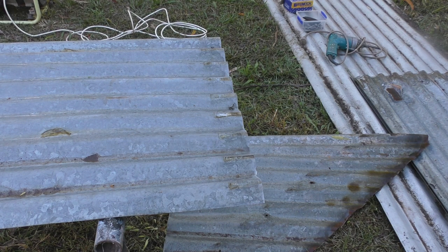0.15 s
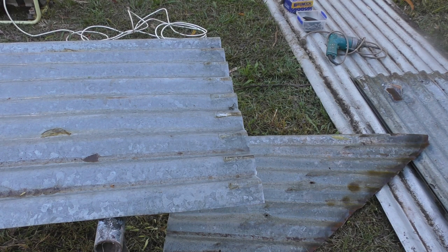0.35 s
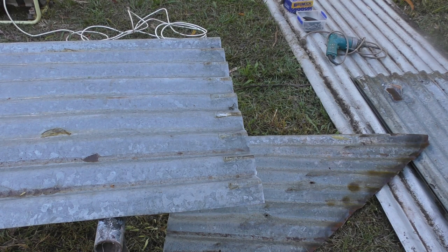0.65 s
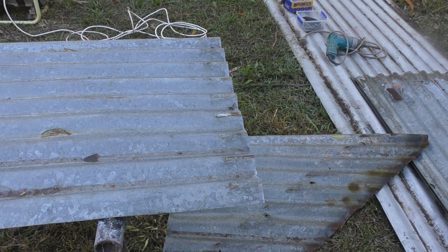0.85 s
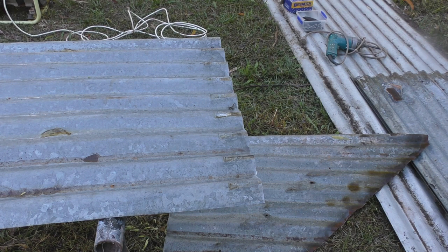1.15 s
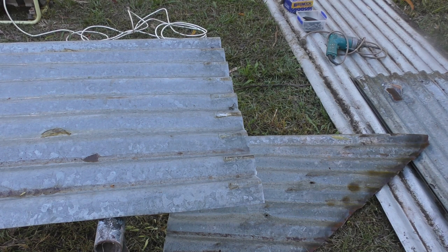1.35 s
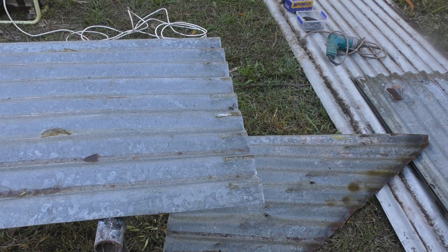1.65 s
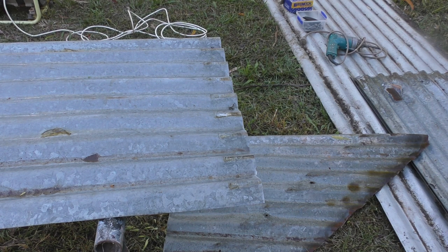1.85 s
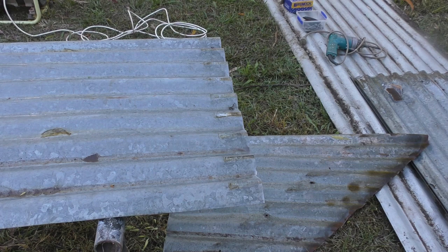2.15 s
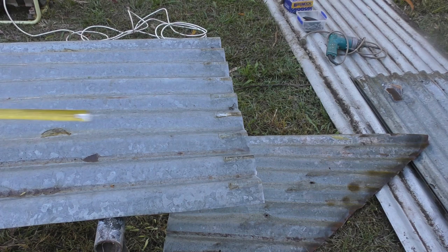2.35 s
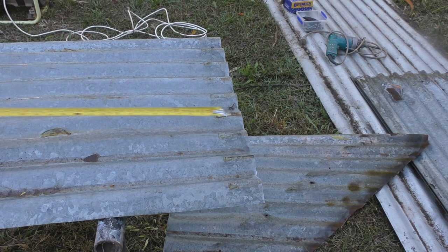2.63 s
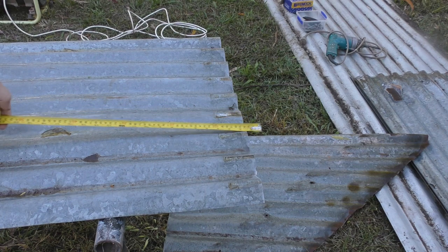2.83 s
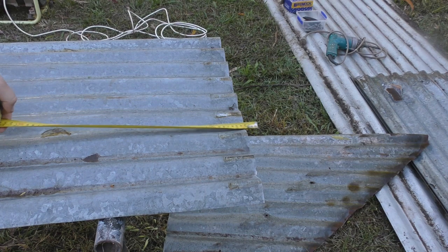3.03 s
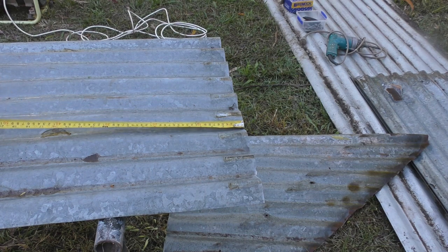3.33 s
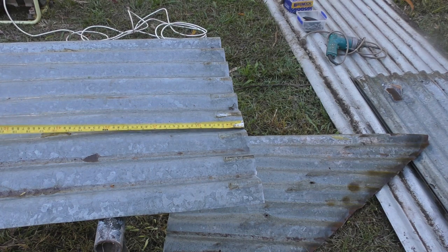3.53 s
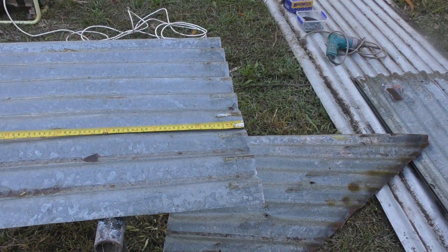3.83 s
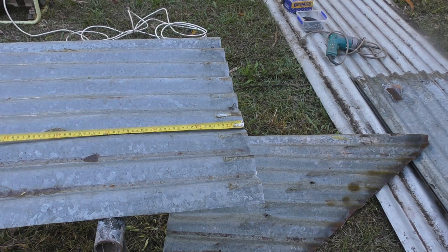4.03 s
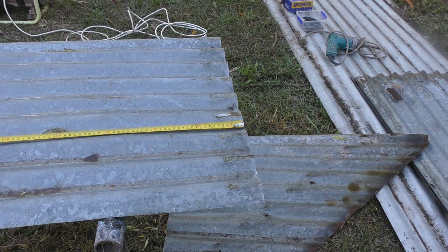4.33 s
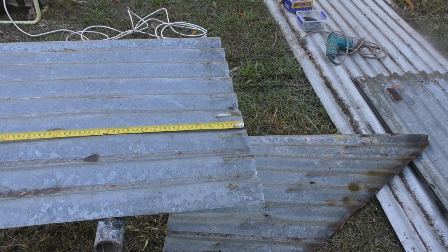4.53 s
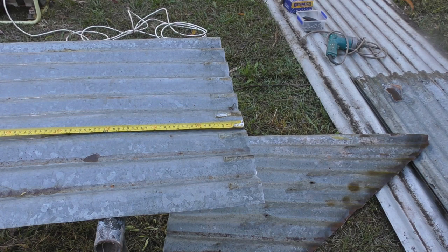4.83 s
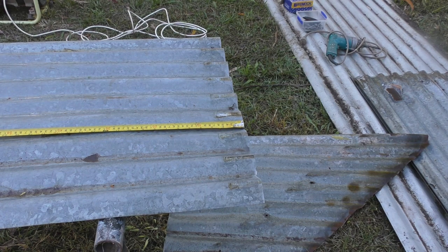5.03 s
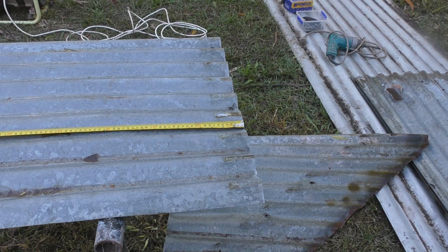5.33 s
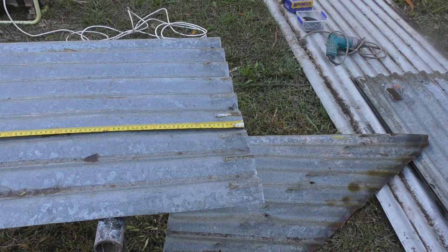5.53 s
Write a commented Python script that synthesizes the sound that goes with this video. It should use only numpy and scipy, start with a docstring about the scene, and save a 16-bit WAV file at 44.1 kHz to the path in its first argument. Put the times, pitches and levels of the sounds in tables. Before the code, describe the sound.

A quiet open-air hush lies under everything. From the start, hands softly rustle, tick and bump on the case of a tape measure, a little left of the stereo microphone, easing off around 1.4 seconds and resuming just after 2. From 1.8 to 2.9 seconds a faint, thin whistle far away sounds four notes, the last one lower. At 2.8 seconds the steel blade lands on a corrugated iron sheet and slides across it in short, gritty, hissing strokes with sharp snaps and rattles, making the sheet boom and clang. This is the loudest part, with the hardest snaps near 3.2, 3.6 and 3.8 seconds. At about 3.9 seconds the blade hooks the edge and rings more brightly as it tightens. From 4.4 seconds the strokes weaken and the sheet's ringing fades. Near 5.5 seconds the hands briefly click and rub the case again.

```python
"""Outdoors, over a quiet hush, hands rustle and tick on a tape measure, left of a stereo microphone. From 1.8 s
a faint, far whistle sounds three notes, the last one stepping lower partway through. At 2.8 s the steel blade
lands on a corrugated iron sheet and slides and snaps across it; its rough push makes the sheet boom and clang.
At 3.85 s the blade hooks the edge and, pulled tight, rings more. The strokes weaken, the sheet rings on and
fades, and near 5.5 s the hands work the case again."""
import sys
import numpy as np
from scipy import signal
from scipy.fft import rfft, irfft
from scipy.io import wavfile
from scipy.ndimage import uniform_filter1d

SR = 44100
rng = np.random.default_rng(int(sys.argv[2]) if len(sys.argv) > 2 else 0)


def int16_out(signal):
    """Quantize to a 16-bit WAV file."""
    q = np.round(np.clip(np.atleast_2d(signal).T, -1, 1) * 32767)
    wavfile.write(sys.argv[1], SR, q.astype(np.int16))


N = 250488
T = np.arange(N) / SR
KNOCK_HZ, BRIGHT_HZ, CRACK_HZ, SIZZLE_HZ = 800, 1700, 3600, 8500  # where each range of sound starts
HISS_TOP_HZ = 15800

# the pitches at which the steel blade rings: f/Hz, width/Hz, relative level/dB
BLADE_RINGS = [(4440, 2000, 0.5), (5440, 330, 4), (5920, 200, 1.5), (6300, 900, -11), (6420, 280, -8.5),
               (8700, 370, -13)]
# how alike blade and case sound on the left and right: f/Hz, likeness/0-1
NEAR_LIKENESS = [(1000, 1), (4000, 0.96), (12000, 1)]


def sheet(bright, clang, boom):
    """The blade's rough push rings the iron sheet; the contact wanders over six spots."""
    # the blade drops on the sheet and makes it boom: t/s, push/dB
    blows = [(2.843, -12), (3.139, -3.5), (3.214, -6.5), (4.002, -12)]
    shares = undb([6 * walk(6) for _ in range(6)])
    shares = shares / np.sqrt(np.sum(shares ** 2, axis=0))
    spots = [sheet_tap(size=28000) for _ in range(6)]
    ranges = (bright, BRIGHT_HZ, 14000), (clang, KNOCK_HZ, BRIGHT_HZ), (boom, 50, KNOCK_HZ)
    out = 0
    for gain, lo_hz, hi_hz in ranges:
        force = gain * grit(spread_db=1.5, per_s=900) * rng.standard_normal(N)
        if gain is boom:
            for start, db in blows:
                force[int(start * SR)] += undb(db)
        for share, spot in zip(shares, spots):
            tap = band(spot, lo_hz, hi_hz)
            tap = tap / np.sqrt(np.sum(np.mean(tap, axis=0) ** 2))
            out = out + signal.fftconvolve((force * share)[None], tap, axes=1)[:, :N]
    return out


def sheet_tap(size):
    """One tap at one spot on the sheet: a few strong tones over a dense wash of weak ones."""
    # the sheet's own tones: f/Hz, relative level/dB, time to fade by 60 dB/s
    sheet_tones = [(129, -11, .5), (185, -1, .5), (210, 3, .55), (265, 4.5, .45), (305, -4, .5),
                   (365, -2, .5), (436, -5, .4), (458, -11, .4), (651, -12, .4), (878, -10, .5),
                   (1040, -5, .5), (1082, -3, .5), (1179, -2, .45), (1270, -3, .45), (1346, -1.5, .45),
                   (1405, -1, .45), (1582, -6, .45), (1711, -7, .4), (2036, -11, .25), (2261, -10, .22),
                   (2552, -10, .22), (2691, -11, .22)]
    # tone colour of the wash: f/Hz, relative level/dB
    wash_colour = [(35, -55), (60, -18.5), (174, -3), (232, -6), (265, 6), (331, -4.5), (361, -4),
                   (576, -5.5), (900, -6.5), (1050, -0.5), (1400, -3), (1560, -9.5), (2900, -10.5),
                   (3790, -14), (6170, -25.5), (12000, -46), (15600, -53), (22000, -120)]
    # how long the wash rings: f/Hz, time to fade by 60 dB/s
    wash_fade = [(100, 0.76), (300, 0.84), (1200, 0.67), (3500, 0.087), (10000, 0.015)]
    # how alike the wash is on the left and right: f/Hz, likeness/0-1
    wash_likeness = [(30, 0.2), (100, 0.86), (400, 0.91), (1000, 0.8), (2200, 0.81), (5000, .9)]
    # how much louder the sheet is on the left: f/Hz, left minus right/dB
    sheet_pan = [(100, -1), (300, 0.5), (600, 1), (1200, 6.5), (2400, 7.5), (4500, 7), (10000, -14.5)]
    # how far ahead its wave is on the left: f/Hz, lead/radians
    sheet_lead = [(300, 0.03), (1120, 0.63), (1400, 0.8), (2700, -0.8), (4500, -1.06), (7000, -0.42)]
    t, hz = T[:size], np.fft.rfftfreq(size, 1 / SR)
    spectrum = rfft(stereo_noise(size, wash_likeness)) * undb(over_hz(wash_colour, hz))
    wash = tones = 0
    for centre_hz in 44 * 2. ** np.arange(9):
        fade_s = over_hz(wash_fade, centre_hz)
        octave = np.clip(1 - np.abs(np.log2((hz + 1) / centre_hz)), 0, 1)  # overlapping bands
        wash = wash + irfft(spectrum * octave, size) * die_away(t, fade_s) / np.sqrt(fade_s)
    # each spot lies at its own angle to the microphone
    scatter = np.minimum(hz / KNOCK_HZ, 1) * rng.standard_normal((2, 1))
    pan_db = over_hz(sheet_pan, hz) - scatter[0]
    lead = over_hz(sheet_lead, hz) + 0.17 * scatter[1]
    for tone_hz, db, fade_s in sheet_tones:
        strength = undb(db + 2.5 * rng.standard_normal())  # varies from spot to spot
        tone_hz = tone_hz * (1 + 0.006 * rng.standard_normal())  # the pressing blade shifts the pitch
        wave = np.sin(2 * np.pi * tone_hz * t + 7 * rng.random())
        tones = tones + strength * wave * die_away(t, fade_s)
    tap = unit(wash) + undb(-2.5) * unit(tones)
    return irfft(pan(rfft(tap), pan_db) * left_ahead(lead), size)


def strokes():
    """Each stroke of the blade lands, fades and lifts: gains for bright ring, clang, boom and two hisses."""
    # strokes on the iron: t/s, length/s, bright/dB, clang/dB, boom/dB, hiss/dB, fine hiss/dB,
    # base fade/(dB per s)
    blade_strokes = [(2.844, 0.22, -33, -35.5, -33.5, -58, -55, 80),
                     (3.072, 0.078, -53.5, -47.5, -49.5, -63, -63, -12),
                     (3.134, 0.094, -37, -36, -40, -39, -38.5, -7),
                     (3.215, 0.22, -27, -31.5, -30.5, -27, -49, 71.5),
                     (3.411, 0.13, -33, -38, -35.5, -37, -45, 64),
                     (3.523, 0.13, -33.5, -37, -38.5, -33.5, -44, 1),
                     (3.642, 0.23, -34, -37, -37.5, -31.5, -37.5, 10),
                     (3.898, 0.088, -37, -38, -40.5, -44, -48, 1),
                     (3.99, 0.15, -34.5, -32, -35.5, -40.5, -45, 33),
                     (4.151, 0.14, -35, -35, -36.5, -45, -49.5, -13),
                     (4.291, 0.104, -36, -33, -37, -43.5, -46.5, 66),
                     (4.395, 0.21, -48, -48.5, -42, -51, -52.5, 29),
                     (4.562, 0.28, -45.5, -43, -40.5, -48.5, -56, 31),
                     (4.851, 0.26, -56.5, -57.5, -47.5, -65, -59, 51),
                     (5.141, 0.66, -68.5, -61.5, -55.5, -92.5, -75, 43.5)]
    land_s, lift_s = 0.003, 0.004
    fade_factors = 1.33, 1, 1, 2, 0.75  # the hiss fades faster than the push on the sheet
    power = np.zeros((5, N))
    for start, length, *levels_db, base_fade in blade_strokes:
        span = slice(int(start * SR), int((start + length + 10 * lift_s) * SR))
        t = T[span] - T[span][0]
        contact = rise(t, land_s) * np.exp(-np.clip(t - length, 0, None) / lift_s)
        for row, db, factor in zip(power, levels_db, fade_factors):
            row[span] += (contact * undb(db - base_fade * factor * t)) ** 2
    return np.sqrt(power)


def snaps():
    """Blade and case snap: a sharp tick and a dying rattle, heard as hollow knock, crack and sizzle."""
    # the blade hits the iron: t/s, knock gain/dB, knock f/Hz, crack gain/dB, crack f/Hz,
    # sizzle gain/dB, base tick fade/s, rattle against tick/dB, base rattle fade/s
    blade_snaps = [(2.8422, -34.5, 1930, -24, 4200, -30, 0.0045, -10, 0.14),
                   (2.8603, -26.5, 1390, -46, 4000, -32.5, 0.0026, -7, 0.17),
                   (2.915, -29, 1400, -40, 4000, -36, 0.0057, -10, 0.04),
                   (3.1391, -25.5, 1310, -43, 6000, -50, 0.0068, -11.5, 0.3),
                   (3.2125, -20, 2870, -8, 6700, -4.2, 0.0056, -18, 0.25),
                   (3.405, -46, 1400, -36, 5900, -34, .005, -6, 0.055),
                   (3.4202, -26.5, 2900, -16.5, 6050, -23, 0.0054, -5.5, 0.071),
                   (3.463, -40, 1410, -32, 6000, -33, .005, -6, 0.057),
                   (3.492, -25.5, 2300, -39, 5000, -34, 0.0054, -13, .03),
                   (3.509, -40, 1400, -32, 7800, -36, 0.0045, -2, 0.043),
                   (3.5279, -34, 1400, -31, 6200, -35, 0.004, -8, 0.078),
                   (3.538, -23, 1380, -26, 5470, -26, .005, -5, 0.093),
                   (3.5685, -18, 2960, -9, 4980, -6.5, 0.0036, -10, 0.1),
                   (3.5837, -31, 3000, -16, 5630, -19.5, .005, -4.5, 0.2),
                   (3.693, -45, 1400, -40, 7500, -26, 0.0046, -4, .04),
                   (3.7567, -31, 1400, -22.5, 5500, -24.5, .004, -1, 0.05),
                   (3.809, -50, 1400, -16, 7050, -29, .005, -9, 0.052),
                   (3.8398, -30, 2800, -1, 7650, -3.5, 0.0026, -23, 0.11),
                   (3.8775, -43, 1400, -9, 6100, -16.5, 0.0064, -3, 0.079),
                   (3.895, -30.5, 2570, -10.5, 6700, -13, 0.0044, -8, 0.1),
                   (4.0005, -31, 1400, -21.5, 6300, -37, 0.0055, -2.5, 0.064),
                   (4.0354, -33, 2800, -17.5, 5640, -25.5, 0.0032, -2.5, 0.13),
                   (4.1614, -33.5, 1390, -20.5, 4770, -42, 0.0049, 0.5, 0.096),
                   (4.1985, -51, 1340, -19.5, 5050, -25.5, 0.0065, -1, 0.075),
                   (4.214, -43, 1400, -22, 5600, -45, .006, 0.5, .05),
                   (4.2278, -26.5, 1380, -13.5, 5650, -20, .005, -6, 0.12),
                   (4.261, -36, 1400, -32, 5300, -25, .004, -24, 0.13),
                   (4.286, -43, 1400, -31, 6300, -51, .005, -5, 0.08),
                   (4.3135, -29, 1400, -24, 6300, -32, .005, -8, 0.1),
                   (4.3564, -27.5, 1380, -43, 7000, -28, .005, -7.5, 0.06),
                   (4.38, -48, 1400, -36, 6000, -37, 0.0037, -10, .03),
                   (4.568, -47, 1400, -20, 5340, -26.5, 0.0063, -5, 0.036),
                   (4.6823, -42, 1400, -18.5, 5500, -25, 0.0068, -9.5, 0.065),
                   (4.762, -52, 1400, -20.5, 5440, -31, 0.0082, -7, 0.074)]
    # the case ticks in the hand: t/s, knock gain/dB, knock f/Hz, crack gain/dB, sizzle gain/dB
    case_ticks = [(0.0324, -45, 1570, -62, -65), (0.0532, -35.5, 1540, -39, -45),
                  (0.1522, -45, 1220, -64, -66), (0.165, -46, 1560, -57, -65),
                  (0.371, -42.5, 2420, -41.5, -41.5), (0.4587, -35, 2050, -29.5, -27.5),
                  (0.5018, -35.5, 3020, -33, -26.5), (0.63, -37, 2040, -38, -39),
                  (0.6427, -60, 1710, -30.5, -37), (0.6745, -40, 2280, -31, -43),
                  (0.704, -45.5, 2600, -35, -48), (0.7068, -41, 2550, -36, -37),
                  (0.75, -50, 2370, -37, -39), (0.791, -40, 1800, -39, -60), (0.855, -34, 2550, -42, -52),
                  (0.893, -32.5, 2180, -34, -48), (0.958, -43, 1270, -60, -65), (.97, -49, 1100, -68, -66),
                  (1.1036, -46.5, 2200, -45, -56), (1.1913, -47.5, 1780, -54, -67),
                  (1.221, -47, 1100, -60, -64), (1.2504, -28, 1620, -45, -49), (1.29, -52, 3320, -52, -56),
                  (1.307, -48, 1320, -66, -50), (1.5795, -68, 1600, -50, -49),
                  (2.0822, -47.5, 1240, -46, -51), (2.1, -43, 1240, -55, -63), (2.109, -40, 1190, -56, -60),
                  (2.115, -39.5, 1150, -61, -50), (2.137, -51, 1120, -53, -49),
                  (2.1603, -41, 1150, -62, -58), (2.166, -41, 1890, -60, -60), (2.175, -49, 1300, -62, -62),
                  (2.2, -42, 1630, -44, -61), (2.211, -34.5, 1700, -44, -45), (2.235, -48, 1980, -46, -54),
                  (2.2463, -40.5, 1200, -49, -39.5), (2.3095, -56, 1160, -63, -47),
                  (2.5938, -53, 1150, -63, -43), (2.6727, -41, 1280, -66, -61),
                  (5.553, -59, 1250, -31, -51), (5.558, -60, 1250, -42, -51), (5.5935, -43, 1420, -52, -58),
                  (5.633, -55, 1500, -52, -48), (5.653, -58, 1300, -56, -50), (5.664, -47, 1080, -43, -50)]
    # all case ticks share one crack pitch, tick and rattle; the last number is the lean left in dB
    hits = [(*row[:-1], 5600, row[-1], 0.0051, -10.5, 0.053, 7.5) for row in case_ticks]
    hits += [(*row, 3.5) for row in blade_snaps]
    size = 8192
    tracks = np.zeros((3, 2, N + size))
    for start, knock_db, knock_hz, crack_db, crack_hz, sizzle_db, *shape, pan_db in hits:
        knock = snap_burst(size, *shape, stretch=1.1, click_db=8)
        knock = knock + undb(12.5) * ring(knock, knock_hz, 640)
        crack = snap_burst(size, *shape, stretch=1, click_db=9.5)
        crack = undb(-10) * crack + ring(ring(crack, crack_hz, 3500), crack_hz, 3500)
        sizzle = snap_burst(size, *shape, stretch=0.55, click_db=6.5)  # the treble dies first
        i = int(start * SR)
        for track, burst, db in zip(tracks, (knock, crack, sizzle), (knock_db, crack_db, sizzle_db)):
            track[:, i:i + size] += pan(undb(db) * burst, pan_db)
    knocks, cracks, sizzles = tracks[:, :, :N]
    knocks = band(knocks, KNOCK_HZ, CRACK_HZ, order=4)
    # a snap rings the blade less, and more evenly, than steady rubbing does
    cracks = band(blade(cracks, BLADE_RINGS, ring_db=-21.5, flex_db=-1.5), CRACK_HZ, SIZZLE_HZ)
    sizzles = band(sizzles + undb(2.5) * ring(sizzles, 9220, 4000), SIZZLE_HZ, 22000, order=2)
    return knocks, cracks + sizzles


def snap_burst(size, tick_s, rattle_db, rattle_s, stretch, click_db):
    """The noise of one hit: a click at first contact, a short tick and a longer rattle."""
    t = T[:size]
    noise = stereo_noise(size, NEAR_LIKENESS)
    noise = noise / np.sqrt(np.mean(noise[:, :64] ** 2)) * rise(t, 0.00034)
    tick = die_away(t, tick_s * stretch)
    rattle = undb(rattle_db) * rise(t, 0.0016) * die_away(t, rattle_s * stretch)
    burst = noise * (tick + rattle)
    burst[:, 8] += undb(click_db)
    return burst


def blade(x, rings, ring_db=0, flex_db=2.5):
    """The thin curved steel adds its ringing to x; as it flexes, now one pitch stands out, now another."""
    hooked_s, loose_db, tight_db = 3.85, -12, 7.5  # once the hook holds, the stretched blade rings more
    ringing = sum(undb(db + flex_db * walk(14)) * ring(x, hz, width) for hz, width, db in rings)
    return x + undb(ring_db + np.where(T < hooked_s, loose_db, tight_db)) * ringing


def rub(hiss_gain, fine_gain):
    """The sliding blade catches many times a second, making a gritty hiss with a finer one above it."""
    # the blade's highest rings: f/Hz, width/Hz, relative level/dB
    top_rings = [(11000, 390, -25.5), (12400, 1200, -21.5)]
    catches = grit(spread_db=1.6, per_s=1500)
    noise, fine_noise = (stereo_noise(N, NEAR_LIKENESS) * catches for _ in range(2))
    hiss = band(blade(noise, BLADE_RINGS), CRACK_HZ, SIZZLE_HZ)
    hiss = unit(hiss) * hiss_gain * undb(1.8 * walk(44))
    fine = band(blade(fine_noise, top_rings), 8000, 14000, order=1)
    fine = cut_above(band(fine, SIZZLE_HZ, 19000), HISS_TOP_HZ)
    fine = unit(fine) * fine_gain * undb(2.6 * walk(40))
    return pan(hiss + fine, 3.1)


def out_of_step(x):
    """The waves from blade and case reach the microphone's two sides slightly out of step."""
    # how far ahead the wave is on the left: f/Hz, lead/radians
    near_lead = [(0, 0), (1120, 0.9), (2240, -0.0), (2930, 0.2), (3620, -0.8), (4310, 0.78), (4910, -1.2),
                 (6890, -0.0), (10300, -1.1), (11500, -0.2), (11900, -0.76), (14100, -0.1), (15800, 0.0),
                 (16500, 0.5)]
    lead = over_hz(near_lead, np.fft.rfftfreq(N, 1 / SR))
    return irfft(rfft(x) * left_ahead(lead), N)


def handling():
    """How strongly the hands work case and blade over time, as four gains."""
    # handling noise: t/s, hollow rustle/dB, rasp/dB, hiss/dB, fine hiss/dB
    hand_levels = [(0.0, -64, -78, -66.5, -69), (.49, -68, -71, -64, -66.5), (.52, -58, -54.5, -52, -64),
                   (.6, -65.5, -58.5, -55.5, -59), (.66, -54, -54.5, -53, -56),
                   (.72, -63.5, -56, -49, -50.5), (.8, -58.5, -55.5, -53.5, -55),
                   (.9, -65, -56, -56, -56.5), (.95, -58, -62, -58, -67), (.99, -65, -70, -70, -70.5),
                   (1.45, -76, -80, -73.5, -72.5), (2.07, -72, -77, -71, -72),
                   (2.1, -54.5, -67, -67, -67.5), (2.3, -65.5, -66.5, -65, -66.5),
                   (2.57, -60.5, -68, -67, -67), (2.61, -52.5, -56.5, -58, -53.5),
                   (2.68, -52, -56, -55, -59), (2.7, -64, -70, -68, -67), (3.1, -82, -77.5, -69, -86),
                   (5.5, -76.5, -70.5, -85, -72.5), (5.546, -71, -61.5, -76, -73),
                   (5.552, -62, -61, -51, -49), (5.6, -55, -60, -54.5, -54.5), (5.612, -55, -59, -72, -71),
                   (5.68, -57.5, -60, -61, -55)]
    times, *columns = np.transpose(hand_levels)
    return [undb(np.interp(T, times, db)) for db in columns]


def hands(hollow_gain, rasp_gain):
    """Fingers rub and bump the case: a hollow rustle, a rasp, a dull rumble and soft thuds."""
    # fingers bump the case: t/s, level/dB, f/Hz
    bumps = [(0.034, -48, 304), (0.158, -41.5, 330), (.18, -43.5, 221), (0.677, -42, 358),
             (1.227, -41.5, 463), (2.098, -52, 250), (2.111, -45, 354), (2.159, -36.5, 410),
             (2.249, -44, 332)]
    thuds, t = np.zeros(N), T[:8192]
    shape = rise(t, 0.0005) * die_away(t, 0.031)
    for start, db, hz in bumps:
        thuds[int(start * SR):][:len(t)] += undb(db) * shape * np.sin(2 * np.pi * hz * t)
    noise = stereo_noise(N, likeness=[(300, 0.9), (2000, 0.09)]) * grit(spread_db=2.5, per_s=500)
    noise = noise * undb(2.2 * walk(6.2))
    case_ring = noise + undb(30) * ring(noise, 1365, 440)
    hollow = hollow_gain * unit(band(case_ring, 1090, BRIGHT_HZ, order=2))
    rasp = rasp_gain * unit(band(noise, BRIGHT_HZ, 3800, order=2))
    rumble = hollow_gain * undb(-7) * unit(band(noise, 150, 560, order=2))
    return pan(hollow, 2) + pan(rasp, 10) + pan(thuds + rumble, 0.65)


def whistle():
    """A thin, wavering tone far away; each note swells, sags a little in pitch and fades."""
    # the whistled notes, the last one in two parts: t/s, length/s, f/Hz, level/dB
    notes = [(1.81, 0.33, 1206, -67.5), (2.168, 0.39, 1205, -58.5), (2.692, 0.085, 1205, -63),
             (2.78, 0.11, 1170, -58)]
    sag_hz_per_s, waver_hz, waver_db = 15.26, 2, 2
    out = 0
    for start, length, hz, db in notes:
        t = np.clip(T - start, 0, length)
        pitch = hz - sag_hz_per_s * (t - length / 2) + waver_hz * walk(24.6)
        swell = np.abs(np.sin(np.pi * (t / length) ** 1.3)) ** 0.42  # loudest past the middle
        out = out + np.sqrt(2) * undb(db) * swell * np.sin(2 * np.pi * np.cumsum(pitch) / SR)
    return pan(out * undb(waver_db * walk(15)), 1.8)


def air():
    """A quiet open-air hush; each octave flickers a little on its own."""
    # tone colour of the hush: f/Hz, relative level/dB
    air_colour = [(15, -40), (25, -6.5), (113, 5.5), (276, 2.5), (437, -1), (587, -11.5), (769, -14),
                  (955, -6), (1280, -2.5), (1780, -2.5), (5230, -21), (7630, -27.5), (11400, -24.5),
                  (15800, -18)]
    # how alike the hush is on the left and right: f/Hz, likeness/0-1
    air_likeness = [(30, 0.2), (60, 0.2), (300, 0.36), (700, 1), (1400, 0.4), (3000, 0.06), (7000, 0.2),
                    (15000, 0.13)]
    hz = np.fft.rfftfreq(N, 1 / SR)
    spectrum = rfft(stereo_noise(N, air_likeness)) * undb(over_hz(air_colour, hz)) * (hz < HISS_TOP_HZ)
    hush = 0
    for lo_hz in 25 * 2 ** np.arange(10.):
        octave = irfft(spectrum * (hz >= lo_hz) * (hz < 2 * lo_hz), N)
        hush = hush + octave * undb(0.8 * walk(3.7))
    return pan(unit(hush) * undb(-59), 0.62)


def stereo_noise(size, likeness):
    """Left and right white noise, alike to the given degree at each frequency."""
    alike = np.clip(over_hz(likeness, np.fft.rfftfreq(size, 1 / SR)), 0, 1)
    mid, side = rfft(rng.standard_normal((2, size)))
    return irfft(mid * np.sqrt((1 + alike) / 2) + np.array([[1], [-1]]) * side * np.sqrt((1 - alike) / 2))


def walk(per_s):
    """A random drift of about +-1 that heads for a new value per_s times a second."""
    hold = int(SR / per_s)
    steps = np.repeat(rng.standard_normal(N // hold + 1), hold)
    return 1.18 * uniform_filter1d(steps, hold)[:N]


def grit(spread_db, per_s):
    """Gain of a rubbing contact: many tiny catches of very unequal size."""
    hold = int(SR / per_s)
    sizes = np.minimum(rng.exponential(size=N // hold + 1), 4)
    return unit(np.repeat(undb(spread_db * sizes), hold)[:N])


def over_hz(table, hz):
    """Read a table between its rows, on a log frequency axis."""
    row_hz, values = np.transpose(table)
    return np.interp(np.log(hz + 1), np.log(row_hz + 1), values)


def undb(db):
    return 10 ** (np.asarray(db) / 20)


def unit(x):
    """Scale x to an average power of 1."""
    return x / np.sqrt(np.mean(x ** 2))


def rise(t, rise_s):
    return np.minimum(t / rise_s, 1)


def die_away(t, fade_s):
    """Fall by 60 dB every fade_s seconds."""
    return 1000 ** (-t / fade_s)


def pan(x, left_db):
    """Make the left side left_db louder than the right."""
    return x * undb(np.array([[.5], [-.5]]) * left_db)


def left_ahead(radians):
    """Factors for a spectrum that put the left wave ahead of the right."""
    return np.exp(np.array([[.5j], [-.5j]]) * radians)


def ring(x, hz, width_hz):
    """Keep the part of x near one pitch."""
    return signal.lfilter(*signal.iirpeak(hz, hz / width_hz, SR), x)


def band(x, lo_hz, hi_hz, order=3):
    return signal.sosfilt(signal.butter(order, [lo_hz, hi_hz], "band", fs=SR, output="sos"), x)


def cut_above(x, top_hz):
    return signal.sosfilt(signal.ellip(10, .2, 80, top_hz, fs=SR, output="sos"), x)


def scene():
    """Add up sheet, blade, case, hands, whistle and air; both strokes and hands make the blade hiss."""
    bright, clang, boom, slide, fine_slide = strokes()
    hollow, rasp, hiss, fine_hiss = handling()
    knocks, cracks = snaps()
    rubbing = rub(np.hypot(slide, hiss), np.hypot(fine_slide, fine_hiss))
    steel = out_of_step(cracks + rubbing)
    return sheet(bright, clang, boom) + steel + knocks + hands(hollow, rasp) + whistle() + air()


def record(dry):
    """The loudest snaps are rounded, the microphone weakens the highest treble and the top is cut off."""
    rounded = np.tanh(dry)
    body = signal.sosfiltfilt(signal.butter(12, HISS_TOP_HZ, fs=SR, output="sos"), rounded)
    treble = rounded - body
    return cut_above(body + undb(-18) * treble, top_hz=16850)


dry = scene()
out = record(dry)
int16_out(out)
```